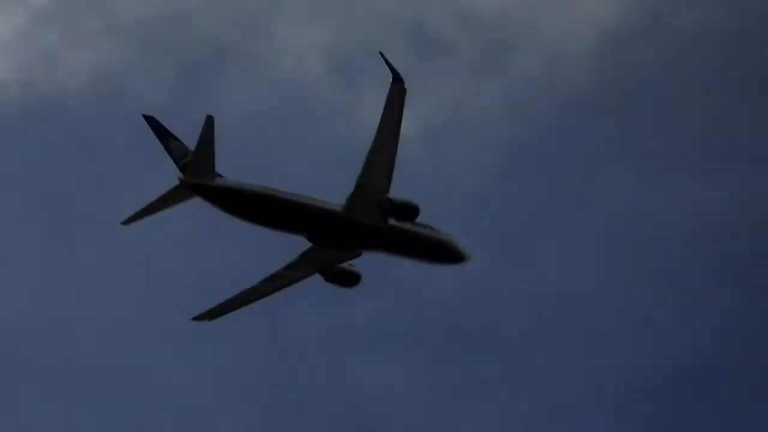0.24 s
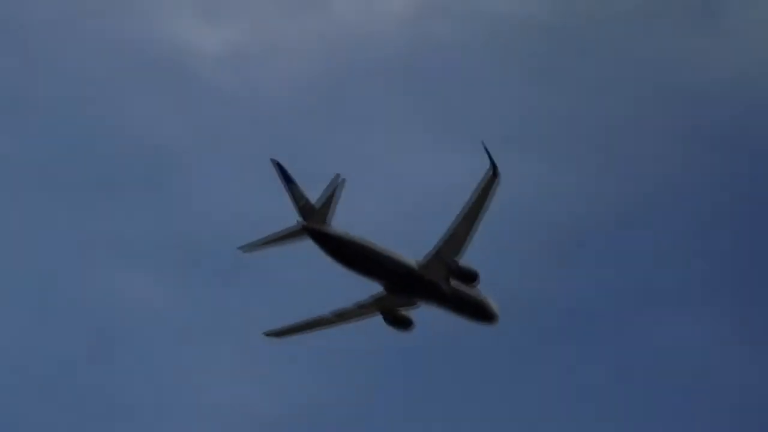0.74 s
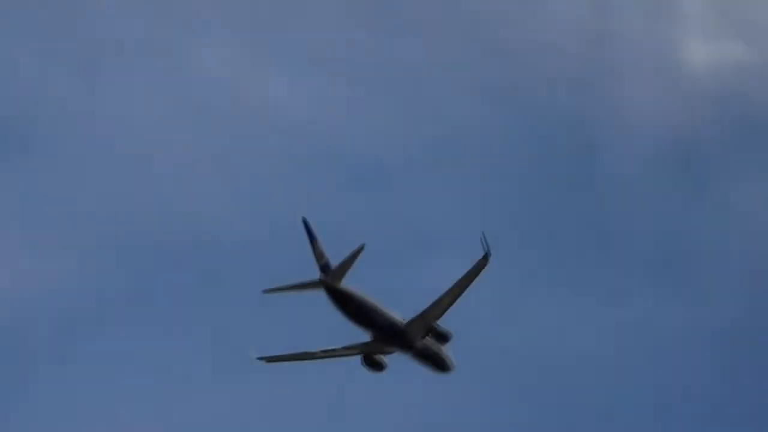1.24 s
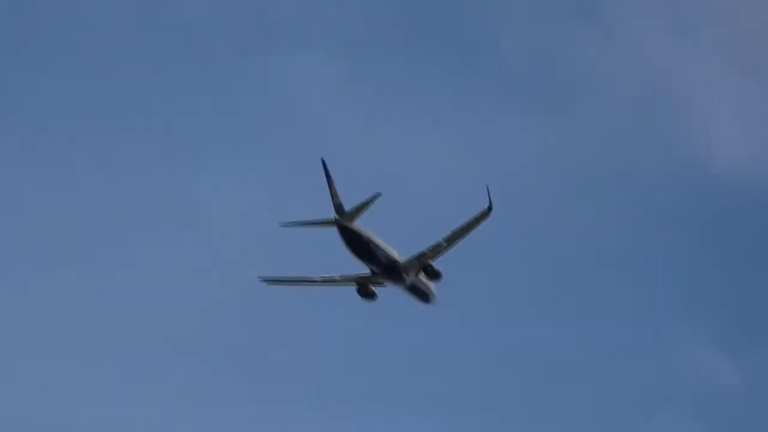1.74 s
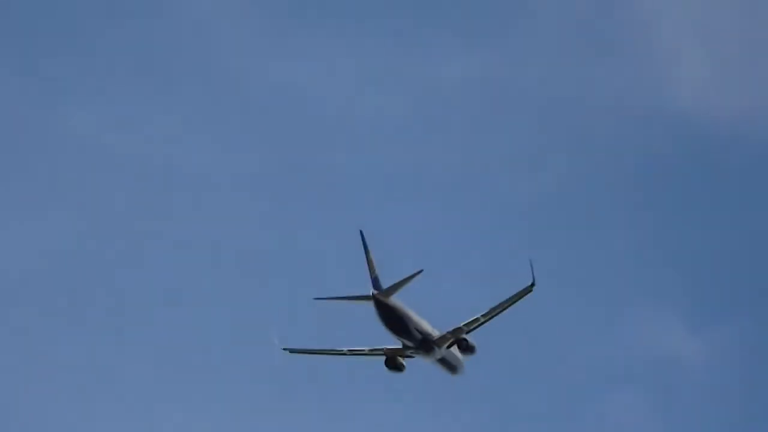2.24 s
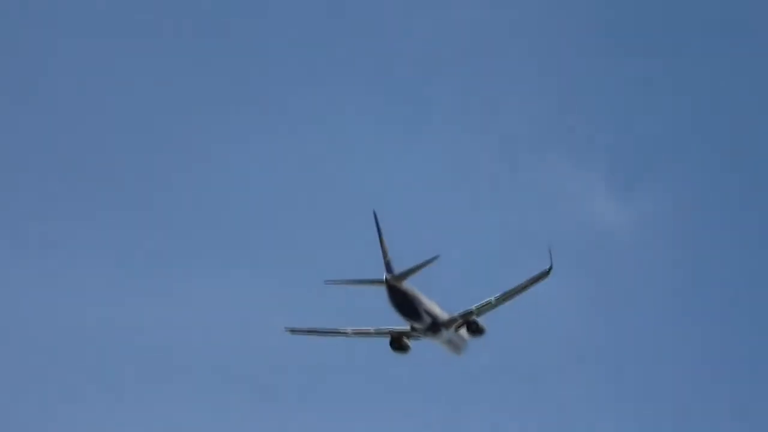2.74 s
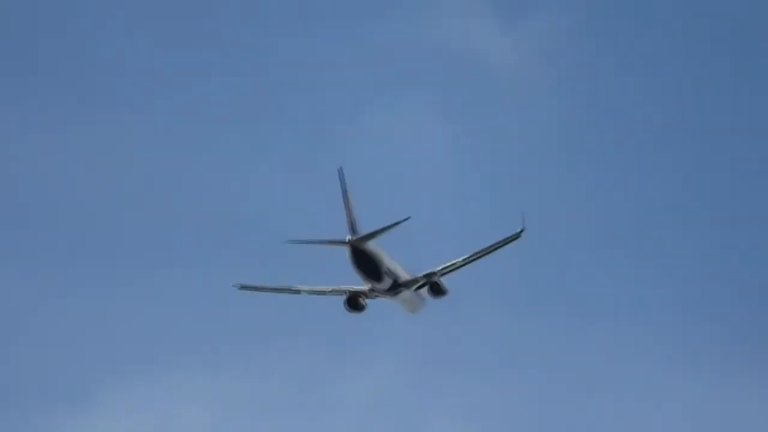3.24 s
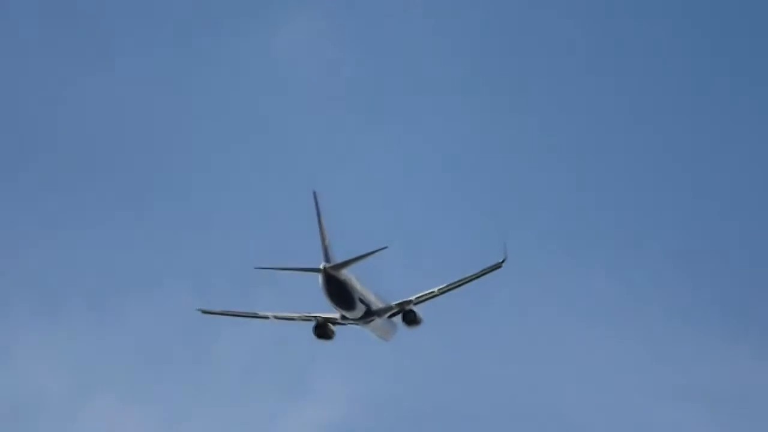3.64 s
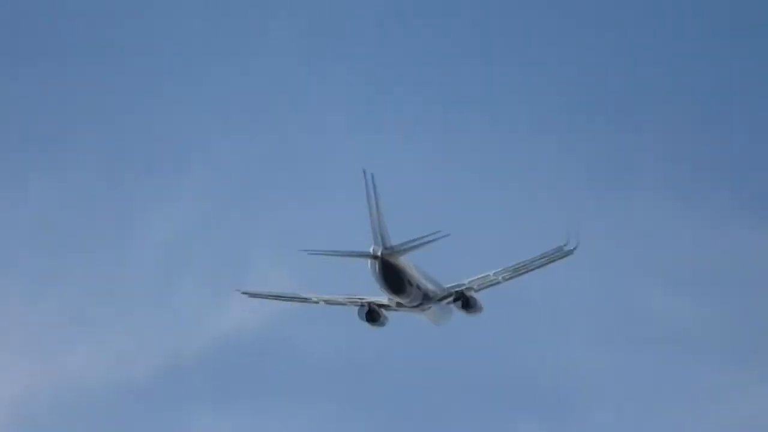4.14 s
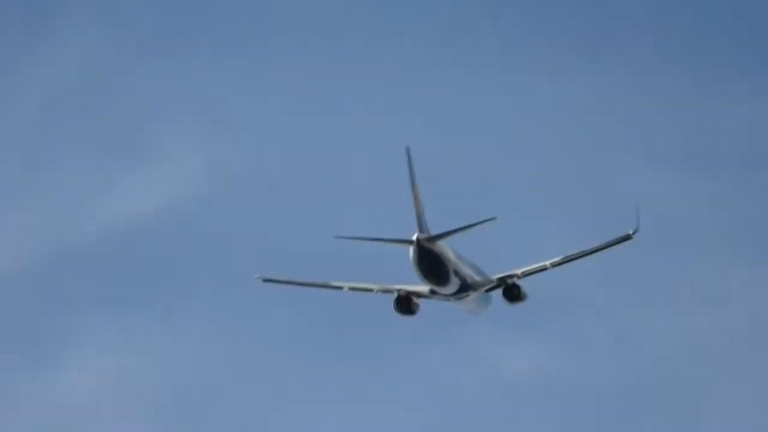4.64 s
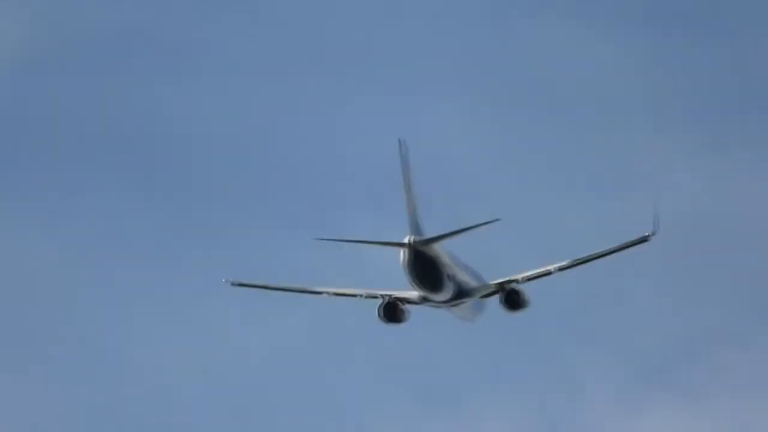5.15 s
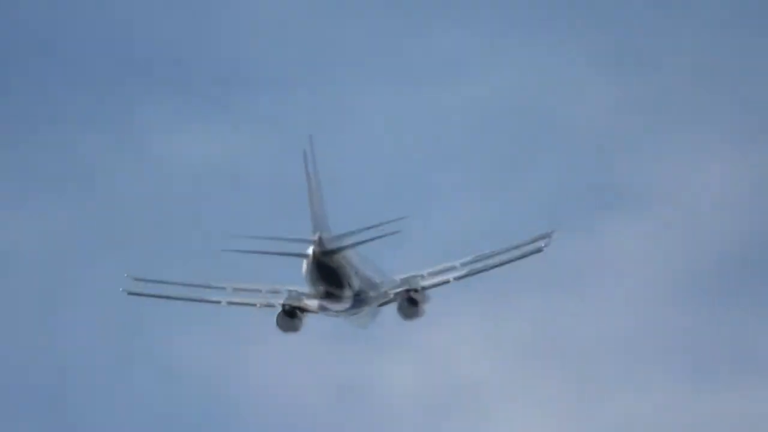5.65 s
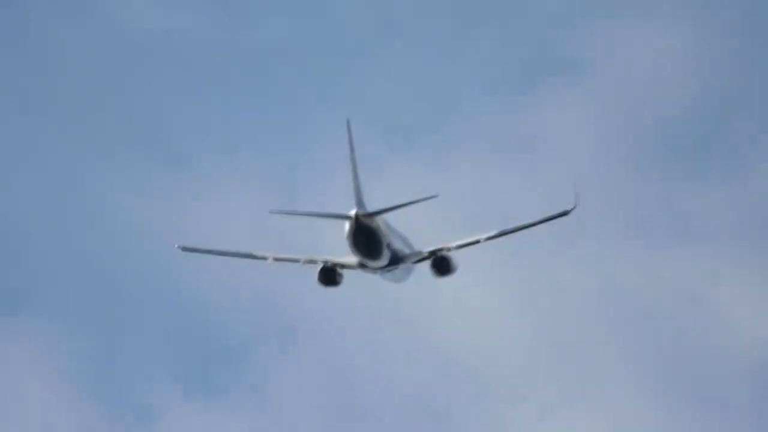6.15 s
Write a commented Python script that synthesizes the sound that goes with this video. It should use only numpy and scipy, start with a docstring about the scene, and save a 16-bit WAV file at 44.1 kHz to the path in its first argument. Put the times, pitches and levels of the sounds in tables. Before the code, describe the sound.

A jet airliner climbs away outdoors, its roar and falling high whine fading while wind increasingly buffets and crackles on the microphone.

```python
"""A jet airliner recedes at take-off thrust, heard in the open; its exhaust roars over broad fan noise.
At first a fan whistle sinks by Doppler shift, flaring and breaking off before it grows faint.
The roar meets its own ground echo, and the peaks of this comb sweep upward as the lag shortens.
Whine and hiss, shaped noise, fade with distance; two-voiced bird chirps sound faintly three times.
Meanwhile the wind rises unevenly: low turbulence overloads the microphone, and each swell ends in a crack."""
import sys
import numpy as np
from scipy import signal
from scipy.fft import rfft, irfft
from scipy.io import wavfile
from scipy.ndimage import uniform_filter1d, minimum_filter1d

SR = 44100
rng = np.random.default_rng(int(sys.argv[2]) if len(sys.argv) > 2 else 0)


def file_out(sig):
    """Save sig as 16-bit WAV at sys.argv[1]."""
    # one column per channel
    cols = np.atleast_2d(sig).T
    # limit, then scale
    lim = np.clip(cols, -1, 1)
    pcm = np.round(lim * 32767).astype(np.int16)
    wavfile.write(sys.argv[1], SR, pcm)


N = 282240
TIME = np.arange(N) / SR  # s
FREQS = np.maximum(np.arange(N // 2 + 1) * SR / N, 1)  # Hz
# a difference signal enters left and right with opposite signs
SIDES = np.array([[-1], [1]])
# Wind buffets that end in a crack. Each row: time in seconds [s], relative strength in decibels [dB].
BUFFETS = [(0.095, -39), (.127, -36), (.2669, -39), (.4161, -35), (.5166, -41), (.623, -38), (0.755, -32),
           (.836, -38), (0.87, -34), (.9064, -37), (.965, -33), (1.0171, -42), (1.0491, -41), (1.1714, -40),
           (1.365, -32), (1.5258, -27.5), (1.5363, -41), (1.651, -33), (1.7511, -29), (1.778, -33),
           (1.8696, -37), (1.9644, -45), (1.9828, -38), (2.0842, -31), (2.135, -35), (2.261, -31.5),
           (2.3374, -31), (2.402, -38.5), (2.5614, -41), (2.6301, -30), (2.679, -28.5), (2.774, -33),
           (2.8078, -40), (2.862, -30.5), (2.8734, -46), (3.061, -34), (3.1162, -31.5), (3.2113, -39),
           (3.2214, -34), (3.29, -30), (3.356, -27.5), (3.437, -36.5), (3.5125, -29), (3.5223, -43.5),
           (3.6195, -43.5), (3.682, -35), (3.6957, -32), (3.7457, -39), (3.848, -33), (3.9129, -40),
           (3.981, -29.5), (4.0018, -33.5), (4.0985, -42), (4.1725, -29.5), (4.178, -31.5), (4.2782, -30.5),
           (4.343, -42), (4.3609, -29), (4.397, -29), (4.5185, -29), (4.5742, -33), (4.701, -45.5),
           (4.725, -35.5), (4.7573, -40.5), (4.8458, -32.5), (4.8492, -30.5), (4.8818, -43), (4.9201, -30),
           (4.9888, -26.5), (4.999, -34), (5.1275, -38), (5.1535, -33.5), (5.2487, -37), (5.287, -30),
           (5.319, -37), (5.356, -31.5), (5.4365, -28), (5.4542, -29.5), (5.46, -29), (5.492, -40.5),
           (5.5506, -33.5), (5.6146, -43), (5.7107, -42), (5.7255, -32), (5.753, -29), (5.7851, -41.5),
           (5.839, -30), (5.934, -42), (5.9692, -27.5), (6.003, -41), (6.037, -44.5), (6.0992, -39.5),
           (6.1259, -31), (6.2475, -32), (6.2793, -34), (6.2925, -27.5), (6.356, -41)]


def exhaust(shimmer):
    """Jet mixing noise: large eddies far downstream boom and rumble, small ones near the nozzle roar and rasp."""
    # Spectrum of the jet. Each row: frequency in hertz [Hz], relative density in decibels [dB per Hz].
    jet_spectrum = [(45, -20), (80, 4.5), (130, -0.5), (200, -1.5), (280, -3.5), (400, -9.5), (550, -13.5),
                    (800, -16), (1000, -21.5), (1300, -19), (1500, -22.5), (1750, -20.5), (2000, -26),
                    (2300, -24)]
    # Uneven rumble, strongest near 1 and 3 s, weaker later. Each row: time in seconds [s],
    # rumble level in decibels [dB], boost of the largest eddies before evening in decibels [dB].
    rumble_course = [(0, -19, 5), (.5, -18, 1), (.95, -15.5, 4), (1.6, -17.5, 7.5), (2.6, -16.5, 10.5),
                     (3.2, -14.5, 4), (3.8, -19, 5.5), (4.6, -21, 2), (5.2, -22, 9.5), (6.4, -20.5, 4)]
    # nominal levels when nearest (dB), and dB lost for each dB of spreading
    roar_db, roar_fall = -22.5, 0.95
    rasp_db, rasp_fall = -30, 0.97
    rumble_db, boom_db = in_time(rumble_course)

    jet = with_ground(noise(jet_spectrum), echo=0.7, dull_hz=1320)  # eddies of all sizes share one echo
    low, upper = split(jet, 356)
    boom, rumble = split(low, 185)
    low = evened(rumble + boom * from_db(boom_db), span_s=0.11, slack=0.13)
    boom, rumble = split(low, 183)
    low = boom * from_db(surging(150)) + rumble * from_db(surging(280))

    roar, rasp = split(upper, 1122)
    roar = evened(roar, span_s=0.097, slack=0.54)
    rasp, sizzle = split(evened(rasp, span_s=0.11, slack=.3), 1670, order=16)
    rasp = rasp * from_db(surging(1300)) + sizzle * from_db(surging(2100))

    flutter_db = 1.9 * shimmer + 0.8 * drift(32)
    return (low * from_db(rumble_db + 0.52 * shimmer)
            + roar * from_db(roar_db - roar_fall * spreading() + surging(690) + flutter_db)
            + rasp * from_db(rasp_db - rasp_fall * spreading() + flutter_db))


def fans(shimmer, hiss_loss_db_per_s=0.72, top_loss_db_per_s=2.5, fizz_loss_db_per_s=3.0,
         whine_side_db=-20, hiss_side_db=-15, top_side_db=-9):
    """Atmospheric absorption: as the path lengthens, air swallows the top of the fans' whine and hiss first."""
    # Spectrum of the whine at unit speed. Each row: frequency in hertz [Hz],
    # relative density in decibels [dB per Hz].
    whine_spectrum = [(1800, -30), (2100, -19.5), (2350, -6.5), (2550, -3), (2800, 1), (3050, 0.5),
                      (3250, -1), (3480, -5), (3650, -8.5), (3800, -17), (4100, -35)]
    # Spectrum of the hiss. Each row: frequency in hertz [Hz], relative density in decibels [dB per Hz].
    hiss_spectrum = [(3500, -19.5), (3850, 0.5), (4400, 2), (4850, -4), (5150, -5.5), (5400, -9.5),
                     (5650, -12), (6200, -10.5), (6900, -9.5), (7500, -12.5), (8200, -20.5), (9500, -22),
                     (11000, -35.5), (13000, -43.5)]
    # nominal level when nearest (dB), and dB lost for each dB of spreading
    whine_db, whine_fall = -23, 1.117
    # the whine sinks a little by Doppler shift as the aircraft recedes
    pitch_ratio = 1.0037 - .007 * TIME

    whine = ragged(at_speed(noise(whine_spectrum), pitch_ratio))
    whine = with_ground(whine, echo=0.15, dull_hz=3000) + blade_tone()
    hiss, top = split(noise(hiss_spectrum), 5360, order=16)

    # a part arrives scattered from all around and differs between left and right
    wide_hiss, wide_top = split(noise(hiss_spectrum), 5700, order=16)
    whine = whine + SIDES * from_db(whine_side_db) * at_speed(noise(whine_spectrum), pitch_ratio)
    hiss = hiss + SIDES * from_db(hiss_side_db) * wide_hiss
    top = top + SIDES * from_db(top_side_db) * wide_top

    # each higher part loses level faster than the part below it
    top, fizz = split(top, 6900, order=16)
    top = top + fizz * from_db(-fizz_loss_db_per_s * TIME)
    hiss = hiss + top * from_db(1.7 - top_loss_db_per_s * TIME + surging(6500) - surging(2700))
    sound = whine + hiss * from_db(-15.0 - hiss_loss_db_per_s * TIME)
    level_db = whine_db - whine_fall * spreading() + surging(2460)
    return sound * from_db(level_db + 1.85 * shimmer + .5 * drift(15))


def blade_tone(waver_hz=9):
    """Doppler shift: the blade-passing whistle sinks; turbulent air makes it waver and breaks it up."""
    # Pitch of the tone. Each row: time in seconds [s], frequency in hertz [Hz].
    blade_pitch = [(0, 3640), (.2, 3590), (.4, 3522), (.5, 3478), (.6, 3448), (.85, 3402), (1.1, 3355),
                   (1.6, 3270), (3.0, 3130), (6.4, 3060)]
    # Strength of the whistle, which flares and breaks off several times. Each row: time in seconds [s],
    # nominal level relative to the whine in decibels [dB].
    blade_level = [(0, -10), (.34, -15), (.38, -6.5), (.52, -1), (.56, -16), (.62, -2), (.74, -10),
                   (.82, -6.5), (1.08, -3), (1.3, -15), (3.0, -29), (6.4, -28.5)]
    hz, = in_time(blade_pitch)
    db, = in_time(blade_level)
    phase = 2 * np.pi * np.cumsum(hz + waver_hz * drift(24)) / SR
    scattered = drift(32) * np.cos(phase) + drift(32) * np.sin(phase)
    return from_db(db) * (.8 * np.cos(phase) + .42 * scattered)


def wind():
    """Turbulent pressure at the ports: a stronger wind is louder and sweeps its eddies past faster."""
    # Spectrum of the eddies at unit speed. Each row: frequency in hertz [Hz],
    # relative density in decibels [dB per Hz].
    eddy_spectrum = [(10, -15), (20, -4), (32, 3.5), (52, -0.5), (70, -7.5), (100, -33), (160, -22.5),
                     (400, -69)]
    speedup = .16  # dB of speed per dB of level
    wind_db = gusting()
    speed = from_db(speedup * (wind_db - np.median(wind_db)))
    eddies = at_speed(noise(eddy_spectrum), speed)
    return from_db(wind_db - 0.9) * evened(eddies, span_s=0.14, slack=0.4)


def buffets(crack_db=14.5, small_db=-36, spread_db=4.0, small_per_s=90, bunching_db=3,
            relax_hz=70, swell=0.81, swell_s=0.0096):
    """Overload: wind overloads the microphone, each swell ends in a crack; faint ticks bunch and multiply with wind."""
    # a buffet above this strength has a weaker, opposite step shortly before its crack
    double_crack_db, fore_crack_s, fore_crack_db = -31, .004, -14
    wind_db = gusting()
    steps, swells = np.zeros(N), np.zeros(N)
    for (s, db), side in zip(BUFFETS, rng.standard_normal(len(BUFFETS))):
        height = np.sign(side) * from_db(db + crack_db)
        steps[round(s * SR)] -= height
        if db > double_crack_db:
            steps[round((s - fore_crack_s) * SR)] += height * from_db(fore_crack_db)
        age = (TIME - s) / swell_s
        near = np.abs(age) < 5
        swells[near] += swell * height * (1 - age[near] ** 2) * np.exp(-age[near] ** 2 / 2)

    ticks_per_s = small_per_s * from_db(.5 * (wind_db - wind_db.max()) + bunching_db * drift(19))
    born = rng.random(N) < ticks_per_s / SR
    sizes = from_db(small_db + spread_db * np.minimum(rng.standard_normal(N), 1))
    steps += born * sizes * rng.choice([-1, 1], N)

    # each step relaxes exponentially
    decay = np.exp(-2 * np.pi * relax_hz / SR)
    cracks = signal.lfilter([1], [1, -decay], steps + 1e-18)
    dulled, _ = split(cracks, 14200, order=24)
    return swells + dulled


def bird(curl_hz=350, length_s=0.017, upper_voice_hz=420, upper_db=-5):
    """Frequency modulation: each two-voiced chirp swoops down and up again under a bell-shaped envelope."""
    # Bird chirps. Each row: time of the middle in seconds [s], lowest pitch of the lower voice
    # before its waver in hertz [Hz], peak level of that voice in decibels [dB].
    chirps = [(2.328, 5380, -51), (2.749, 5240, -47), (2.836, 4650, -46)]
    out, waver = np.zeros(N), .35 * drift(240)
    for s, hz, db in chirps:
        age = (TIME - s) / length_s
        phase = 2 * np.pi * length_s * (hz * age + curl_hz * age ** 3 / 3) + waver
        # the upper voice stays a fixed number of hertz above the lower one
        upper = from_db(upper_db) * np.sin(phase + 2 * np.pi * upper_voice_hz * TIME)
        out += from_db(db) * np.exp(-age ** 2) * (np.sin(phase) + upper)
    return out


def port_hiss(shared_db=-70.0, apart_db=-69.0, gust_s=0.028, buffet_db=7, rise_db_per_s=0.64, flicker_db=3.0):
    """Flow noise, partly incoherent between the ports, that rises steadily and flares at each buffet."""
    # Air hissing over the ports. Each row: frequency in hertz [Hz], relative density in decibels [dB per Hz].
    hiss_over_ports = [(2000, 5), (7000, -6), (12800, -10.5), (14500, -8.5), (15800, -16)]
    level_db = rise_db_per_s * TIME + buffet_db * near_buffets(gust_s) + flicker_db * drift(8)
    shared = from_db(shared_db) * noise(hiss_over_ports)
    apart = SIDES * from_db(apart_db) * noise(hiss_over_ports)
    return from_db(level_db) * (shared + apart)


def with_ground(x, echo, dull_hz):
    """Comb filtering by a ground echo, whose treble rough ground scatters away; rms 1."""
    # The echo behind the direct sound. Each row: time in seconds [s], lag in milliseconds [ms].
    ground_lag = [(0, 7.8), (.6, 7.46), (1.1, 6.88), (1.6, 6.24), (2.1, 5.74), (3.1, 4.93), (4.1, 4.44),
                  (5.2, 4.0), (6.4, 3.63)]
    smooth, _ = split(x, dull_hz, order=2)
    return rms_one(x + echo * delayed(smooth, *in_time(ground_lag)))


def spreading():
    """Spherical spreading: loss in dB as the aircraft recedes in a straight line from its nearest point."""
    pass_s = 1.94  # time to fly as far as it is away when nearest
    return 10 * np.log10(1 + (TIME / pass_s) ** 2)


def surging(hz):
    """Amplitude modulation by surges and fades: gain in dB of the sound around a frequency."""
    # Surges and fades, each with a rounded plateau. Each row: time of the middle in seconds [s],
    # half length in seconds [s], gain in decibels [dB], centre in hertz [Hz], half width in octaves [oct].
    surges = [(0.132, 0.018, 2.5, 450, 2), (.135, 0.031, 3.5, 10000, 2), (0.246, 0.02, 6, 900, 1.5),
              (0.395, 0.038, 4, 900, 1.1), (0.438, 0.066, 10, 5000, 1.43), (0.46, 0.018, -5, 180, 0.82),
              (0.713, 0.052, 3.5, 2016, 5.2), (0.882, 0.07, 4, 1100, 2.1), (0.94, 0.037, -2, 2800, 1.1),
              (1.083, 0.013, 8, 169, 1.1), (1.34, 0.2, 2.5, 2970, 1.9), (1.427, 0.027, 3, 900, 3.3),
              (1.51, 0.022, 4.5, 200, 2), (1.803, 0.012, -10, 220, 1.8), (2.03, .035, -3, 170, 0.97),
              (2.076, 0.06, 5, 3200, 1.8), (2.206, .032, -7.5, 160, 0.92), (2.266, 0.02, 1.5, 200, 1.7),
              (2.42, 0.027, 3, 170, .8), (2.63, 0.031, 7, 230, 0.58), (2.745, 0.028, 1, 900, 3.6),
              (2.937, 0.07, -6, 200, 2), (3.032, 0.04, 2.5, 1600, 1.5), (3.106, 0.038, 3.5, 210, 0.8),
              (3.143, .02, -3, 900, 1.8), (3.33, 0.2, -3, 1890, 4.4), (3.413, 0.026, 3, 210, 1),
              (3.586, 0.049, -4, 500, 2.3), (3.668, 0.032, 8, 4000, 1.2), (3.798, 0.11, 3, 3800, 1.5),
              (3.96, 0.038, 4, 910, 2.5), (4.032, 0.049, -4.5, 400, 3.8), (4.143, 0.054, 3.5, 280, 3.5),
              (4.202, .025, -4.5, 600, 5.5), (4.366, 0.11, -4, 1980, 0.98), (4.717, 0.076, 3.5, 350, 4.9),
              (4.69, 0.037, 3, 2970, 2.4), (4.821, 0.033, 8, 950, 2.4), (4.79, 0.16, 2, 1100, 0.66),
              (4.935, 0.049, 2, 2220, 1.8), (5.05, 0.057, -2.5, 1200, 6.5), (5.282, 0.068, 2, 600, 2.2),
              (5.426, 0.019, 5, 3500, 2.6), (5.687, 0.05, 4.5, 600, 3.5), (5.692, 0.085, 5, 1300, 0.31),
              (5.84, 0.13, -3, 1200, 3.1), (6.075, 0.057, 6, 250, 1.7), (6.114, .022, 1, 700, 1.1),
              (6.08, 0.037, 4, 3000, 1.2), (6.255, 0.05, 3, 3200, 1.2), (6.332, 0.041, -3.5, 2000, 6)]
    coarse = TIME[::100]
    gain_db = np.zeros(len(coarse))
    for s, length, db, centre, octaves in surges:
        age = (coarse - s) / length
        offset = np.log2(hz / centre) / octaves
        gain_db += db * np.exp(-np.abs(age) ** 3 - offset ** 2)
    return np.interp(TIME, coarse, gain_db)


def ragged(x, edges_hz=(2550, 2800, 3050, 3300), depth_db=1.8, rate=22):
    """Scintillation by band: turbulent air makes each narrow range flutter on its own; rms 1."""
    out = 0
    for hz in edges_hz:
        part, x = split(x, hz, order=40)
        out = out + part * from_db(depth_db * drift(rate))
    return rms_one(out + x * from_db(depth_db * drift(rate)))


def gusting():
    """Gust superposition: relative wind level in dB, an uneven rise with a gust around each buffet."""
    # Wind on the microphone. Each row: time in seconds [s], relative level without gusts in decibels [dB].
    wind_rise = [(0, -29.5), (.28, -28.5), (.38, -24), (.62, -30), (.75, -20.5), (1.5, -19), (2.3, -17),
                 (2.8, -14.3), (3.7, -16), (4.4, -12.5), (5.15, -14.5), (6.4, -11)]
    gust_db, gust_s = 4.5, 0.02415
    wind_db, = in_time(wind_rise)
    return wind_db + gust_db * near_buffets(gust_s)


def near_buffets(span_s):
    """Gaussian envelope: up to 1 at each buffet, by its strength, falling smoothly towards 0 around it."""
    full_gust_db = -30  # a buffet of this strength or more reaches 1
    out = np.zeros(N)
    for s, db in BUFFETS:
        near = np.abs(TIME - s) < 4 * span_s
        strength = min(from_db(db - full_gust_db), 1)
        bell = strength * np.exp(-((TIME[near] - s) / span_s) ** 2)
        out[near] = np.maximum(out[near], bell)
    return out


def two_ports(sound, lead_ms=0.018, apart_hz=900):
    """Arrival-time difference: a small lead of the right port, applied mainly to the treble."""
    turn = np.pi * FREQS * lead_ms / 1000 / (1 + (apart_hz / FREQS) ** 4)  # radians, half for each port
    return irfft(rfft(sound) * np.exp(1j * turn * SIDES), N)


def noise(spectrum):
    """Spectral shaping: noise of the given spectrum, silent outside it, rms 1."""
    hz, db = np.transpose(spectrum)
    gain = from_db(np.interp(np.log(FREQS), np.log(hz), db, left=-np.inf, right=-np.inf))
    return rms_one(irfft(rfft(rng.standard_normal(N)) * gain, N))


def drift(rate):
    """Low-pass random process: slow chance with about `rate` turns a second, rms 1."""
    return rms_one(irfft(rfft(rng.standard_normal(N)) / (1 + (FREQS / rate) ** 2), N))


def evened(x, span_s=.08, slack=.1):
    """Envelope levelling: chance swells are evened out, less so with more slack; rms 1."""
    power = uniform_filter1d(rms_one(x) ** 2, size=int(span_s * SR))
    return rms_one(x / np.sqrt(power + slack))


def at_speed(noise_loop, speed):
    """Frequency scaling: a loop of noise played at a changing speed, which moves its pitch."""
    return np.interp(np.cumsum(speed) % (N - 1), np.arange(N), noise_loop)


def split(x, hz, order=8):
    """Complementary filtering: the parts below and above a frequency, which add up to x."""
    low = irfft(rfft(x) / (1 + (FREQS / hz) ** order), N)
    return low, x - low


def delayed(x, ms):
    """Propagation delay: x heard later by a fixed or moving lag."""
    return np.interp(TIME - ms / 1000, TIME, x, left=0)


def in_time(rows):
    """Linear interpolation: each column of a curve at every sample."""
    s, *columns = np.transpose(rows)
    return [np.interp(TIME, s, c) for c in columns]


def from_db(db):
    """Logarithmic level: decibels to amplitude gain."""
    return 10 ** (np.asarray(db) / 20)


def rms_one(x):
    """Energy normalisation: scale to rms 1."""
    return x / np.sqrt(np.mean(x ** 2) + 1e-20)


def scene():
    """Superposition of aircraft, wind and bird as the two ports hear them."""
    # the aircraft's layers flutter together; random flutter is scaled down where a surge or fade is listed
    halving_db = 3.5  # size of a surge or fade that halves the flutter
    shimmer = np.tanh(drift(20.5)) / (1 + (surging(2000) / halving_db) ** 2)
    aircraft = exhaust(shimmer) + fans(shimmer)
    return two_ports(aircraft + wind() + buffets() + bird()) + port_hiss()


def record(dry):
    """Peak limiting and low-pass filtering: a smoothed gain holds the peaks, then the top is cut."""
    cutoff_hz = 17000  # 70 dB down from here up
    needed = 1 / np.maximum(np.abs(dry).max(axis=0), 1)
    gain = uniform_filter1d(minimum_filter1d(needed, size=401), size=401)
    low_pass = signal.cheby2(12, 70, cutoff_hz, fs=SR, output="sos")
    return signal.sosfilt(low_pass, dry * gain)


dry = scene()
out = record(dry)
file_out(out)
```